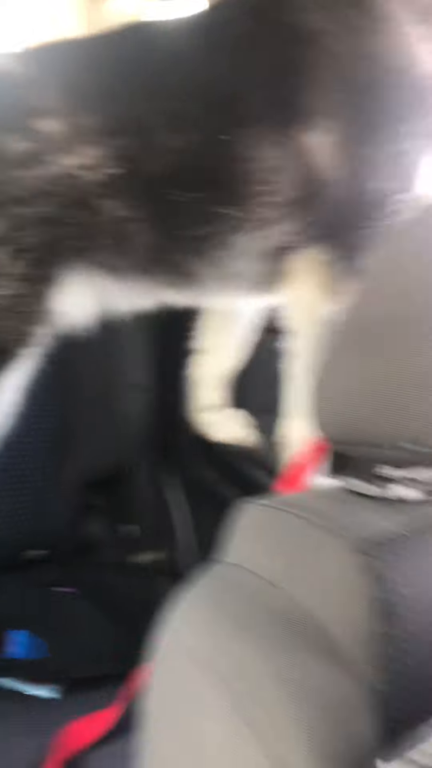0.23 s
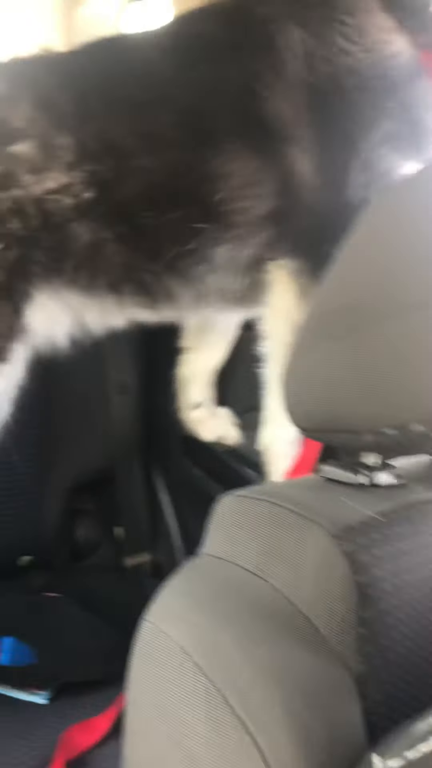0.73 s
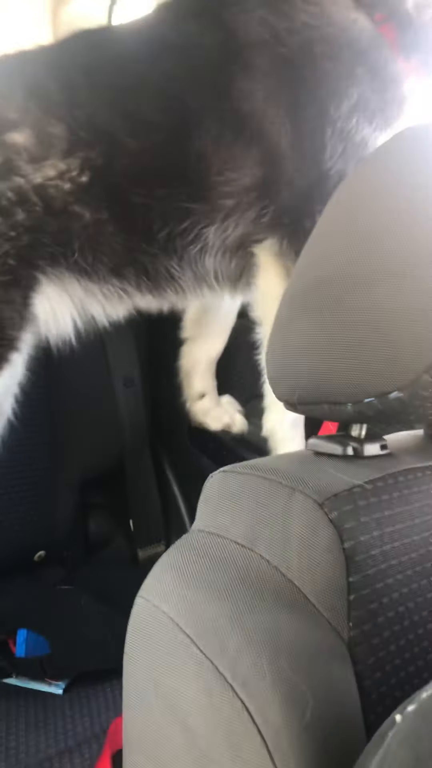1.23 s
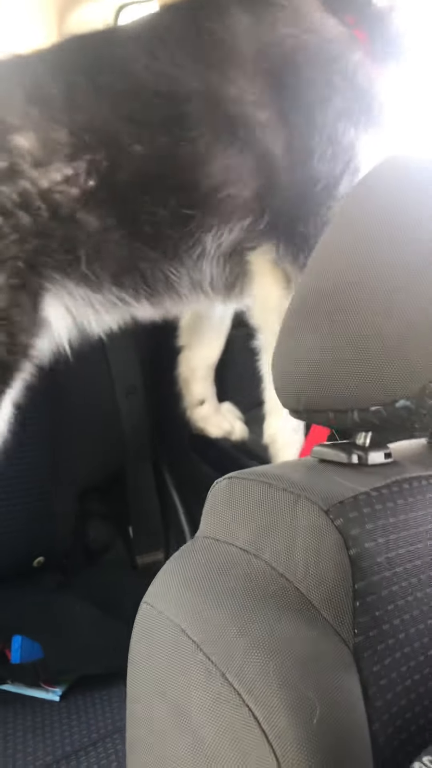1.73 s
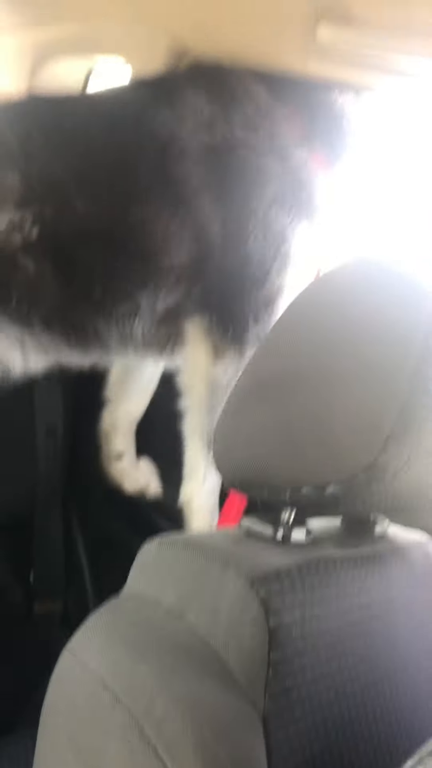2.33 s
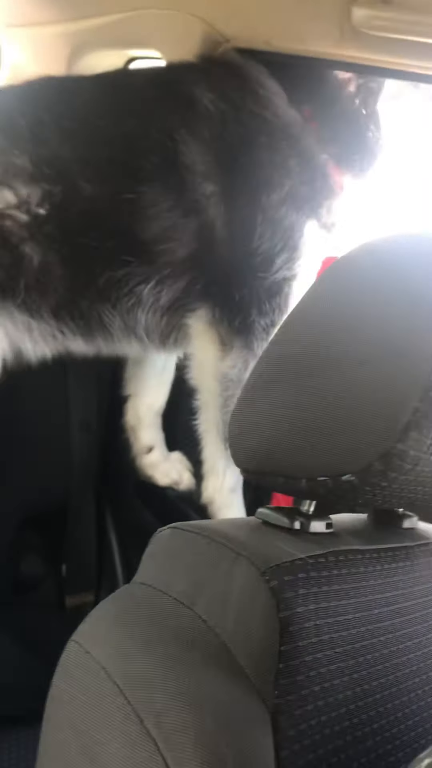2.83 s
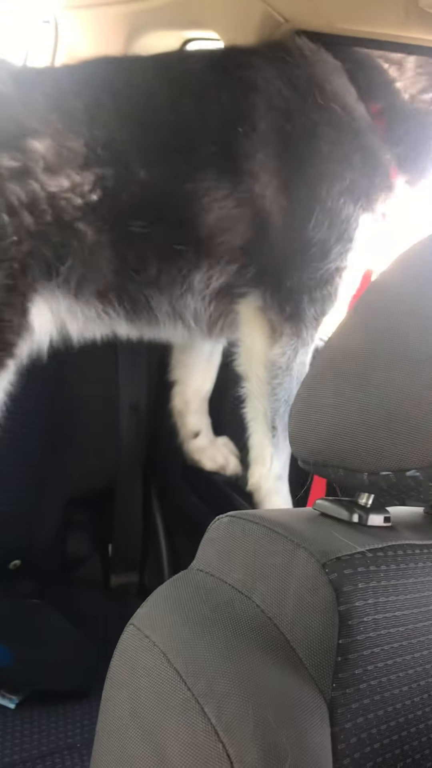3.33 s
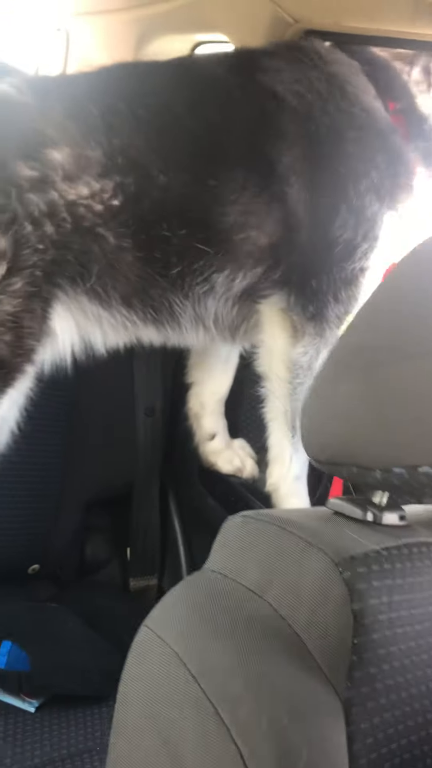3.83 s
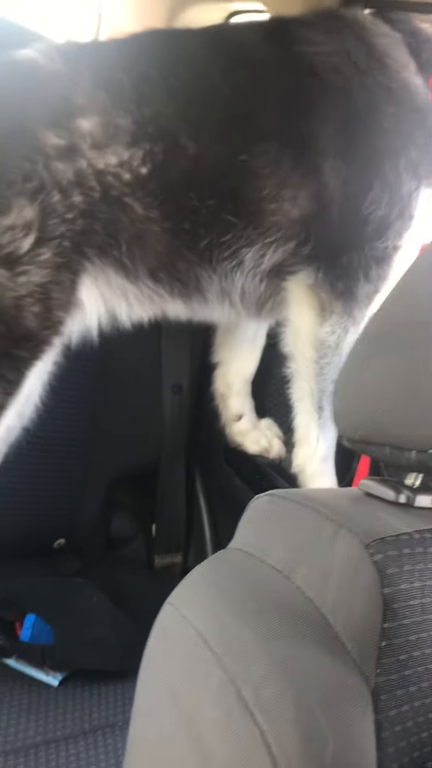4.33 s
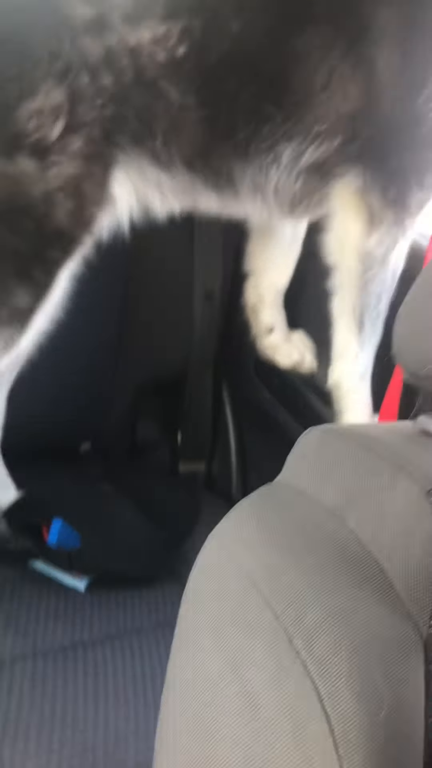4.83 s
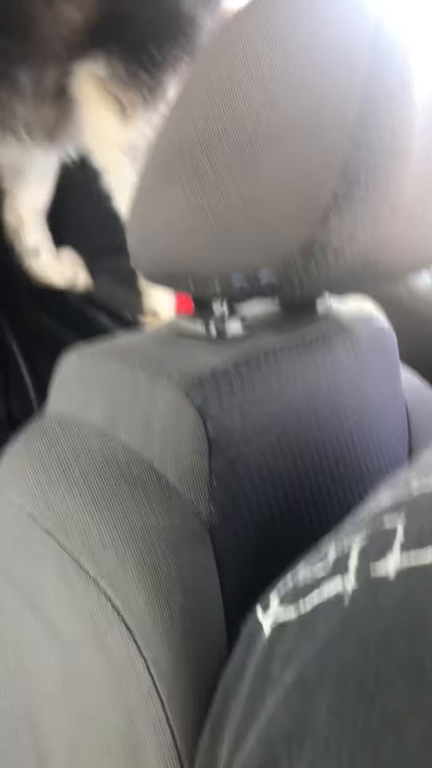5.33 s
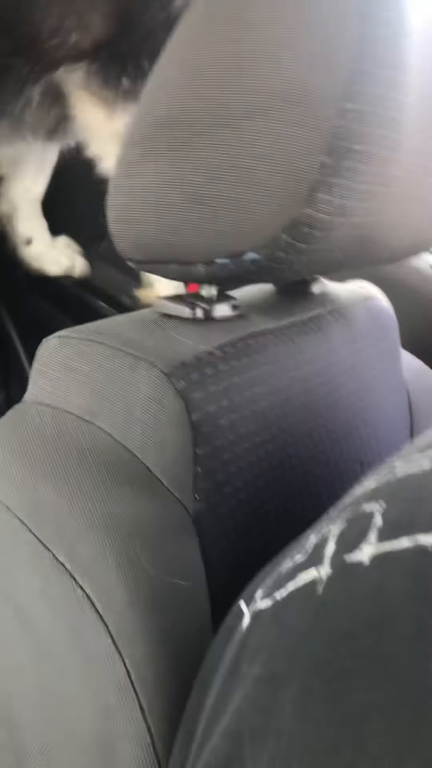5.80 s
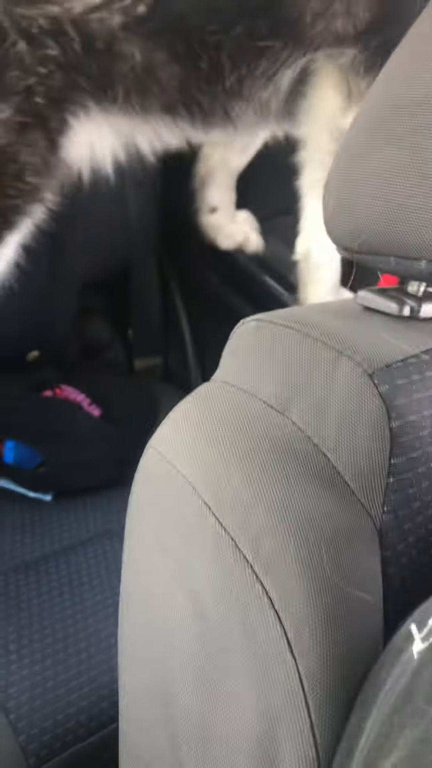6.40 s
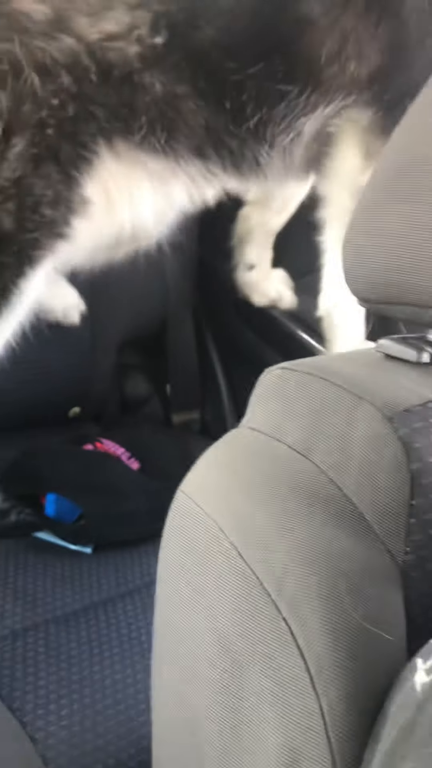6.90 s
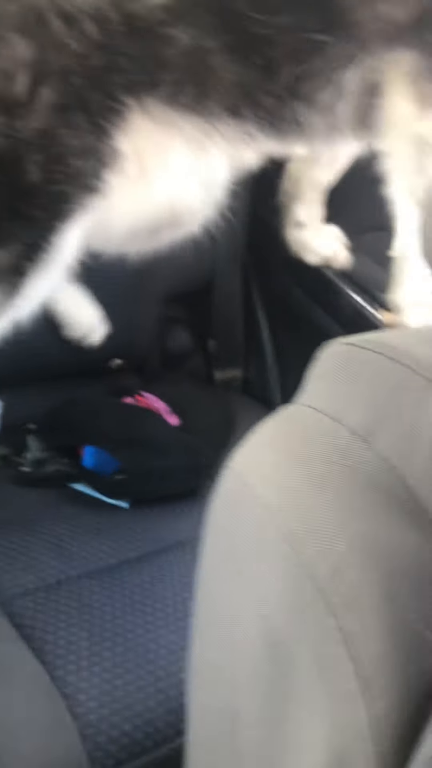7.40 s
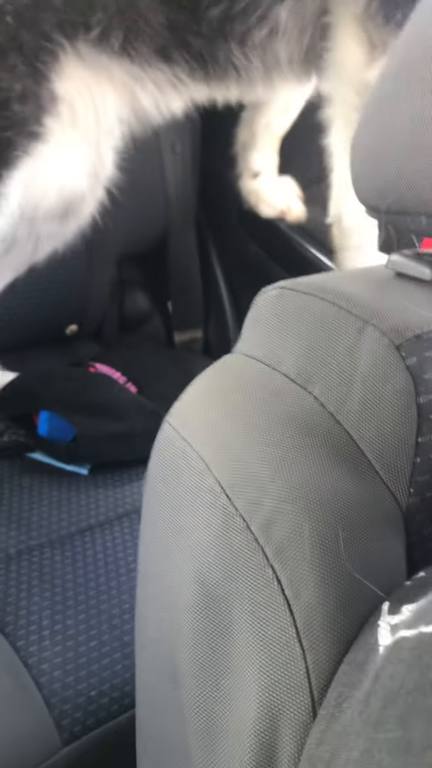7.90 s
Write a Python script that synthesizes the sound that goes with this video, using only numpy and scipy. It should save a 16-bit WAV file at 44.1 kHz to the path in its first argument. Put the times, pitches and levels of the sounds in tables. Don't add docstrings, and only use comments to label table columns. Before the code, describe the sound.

Inside a small car, a close microphone picks up deep, uneven engine and road rumble with faint claw ticks and soft fur rubbing. A dull paw thud lands around two seconds. The car eases to a quieter idle, then pulls away with the engine note climbing as buckles crack sharply and a strap scrapes plastic. Fabric slides and scattered clicks follow, dry and close.

```python
import sys
import numpy as np
from scipy import signal
from scipy.fft import rfft, irfft, next_fast_len
from scipy.io import wavfile
from scipy.ndimage import uniform_filter1d, map_coordinates

SR = 44100
rng = np.random.default_rng(int(sys.argv[2]) if len(sys.argv) > 2 else 0)


def volts_from_db(level):
    exponent = np.asarray(level, float) / 20
    return 10 ** exponent


def transcribe(signal):
    frames = np.atleast_2d(signal).T
    limited = np.clip(frames, -1, 1)
    pcm = np.round(limited * 32767).astype(np.int16)
    wavfile.write(sys.argv[1], SR, pcm)


N = 359415

# [t/s, firing rate f/Hz, level/dB]
ENGINE = [(0, 37.8, -38), (3, 36, -29.5), (4, 36.02, -35), (5.1, 33.68, -27.5), (5.4, 35.75, -29.5),
          (5.6, 39.87, -23), (5.8, 46.64, -25.5), (6, 50.8, -18), (6.15, 55.43, -19), (6.3, 55.85, -20.5),
          (6.5, 56.58, -18.5), (6.7, 59.75, -19), (6.9, 63.9, -22), (7.1, 67.4, -23), (7.5, 70.8, -26.5),
          (7.7, 72.15, -23), (7.9, 72.7, -21.5), (8.15, 75.3, -22)]
# [multiple of the firing rate, level/dB]
ORDERS = [(3.5, -20), (1.5, -24), (2, -7), (2.5, -24), (3, -14.5), (4, -20), (4.5, -23), (5, -27)]
# [f/Hz, width/Hz, level/dB]
AIR_MODES = [(108, 14, 2.5), (168, 14, 6), (220, 14, 3), (265, 34, 5.5), (335, 40, 5.5)]

# [t/s, level/dB]
TYRE_ROAR = [(0, -45), (.4, -43), (1, -46), (2.1, -45.5), (2.6, -49.5), (3.1, -50.5), (3.85, -54.5),
             (4.35, -55), (4.7, -57), (5.2, -56), (5.6, -54), (6.3, -56), (7.5, -51), (8.15, -53.5)]
# [t/s, level/dB, length/s, f/Hz]
JOLTS = [(0.052, -18.5, 0.061, 41.8), (0.393, -22.5, 0.67, 41.61), (.75, -29, 0.19, 43.1),
         (1.31, -20, 0.17, 40.9), (1.63, -23.5, 0.24, 41), (1.768, -32, 0.2, 35.8),
         (1.955, -17, 0.11, 47.73), (2.154, -21, 0.4, 52.5), (2.446, -18.5, 0.22, 53.4),
         (2.726, -24.5, 0.42, 50.4), (3.004, -29, 1, 37.13), (3.386, -23, 0.32, 52.5)]
# [t/s, level/dB, length/s]
HEAVES = [
    (.6, -21.5, 0.36),
    (1.27, -19, 0.44),
    (2.15, -26, .4),
    (2.72, -19, 0.2),
    (3.0, -30, 0.41),
    (4.47, -37, 0.21),
    (5.47, -26, 0.72),
    (6.13, -21.5, 0.79),
    (6.85, -19, 0.92),
    (7.4, -25, 0.88),
]
# [t/s, level/dB, length/s]
COARSE_PATCHES = [
    (.12, -25.5, 0.07),
    (.33, -28, 0.16),
    (1.1, -27.5, 0.31),
    (1.5, -20.5, 0.38),
    (2.1, -26, 0.66),
    (2.5, -22.5, 0.64),
    (2.95, -31, 0.11),
    (4.04, -24.5, 0.071),
    (5.67, -26.5, 0.097),
    (7.4, -25.5, 1.033),
]
# [t/s, level/dB, length/s]
ROAD_JOINTS = [
    (0, -24, 0.026),
    (.29, -25.5, 0.068),
    (1.05, -30, 0.15),
    (1.25, -28.5, 0.26),
    (1.8, -34.5, .25),
    (2.07, -29, 0.13),
    (3.0, -37, 0.19),
    (3.45, -34.5, 0.61),
    (3.8, -33, 0.12),
    (5.15, -33, 0.087),
]
# [f/Hz, level per Hz/dB]
BOOM_TONE = [(11, -28), (18, -6), (43, -3), (90, -6), (120, -37.5), (200, -120)]
DRONE_TONE = [(38, 1), (65, -1), (76, -1.5), (108, 2), (160, -17), (210, -22.5), (350, -120)]
BODY_TONE = [(76, -15.5), (130, 0), (157, -1.5), (193, -1.5), (258, -9), (365, -16), (398, -18.5),
             (450, -30), (520, -26.5), (680, -53), (1140, -120)]
TYRE_TONE = [(250, -11), (420, -2.5), (453, 0), (507, -2.5), (573, -4.5), (740, -4.5), (1060, -8.5),
             (1380, -8.5), (1600, -13), (1990, -18.5), (4000, -38), (5200, -71), (8800, -120)]

# [t/s, level/dB, length/s]
RUBS = [(0, -65, .05), (.42, -62.5, 0.52), (.68, -60, 0.17), (1.03, -62.5, 0.37), (1.37, -60.5, 0.52),
        (1.62, -61.5, 0.39), (2.17, -62.5, 0.2), (2.46, -64, 0.67), (3.02, -64.5, 0.26),
        (3.61, -65.5, 0.09), (4.2, -68, .15), (4.4, -76, 0.17), (4.85, -64.5, 0.22), (5, -60.5, 0.2),
        (5.17, -65, 0.099), (5.4, -58.5, 0.18), (5.68, -62, 0.65), (5.89, -51.5, 0.067), (6.1, -65.5, 0.19),
        (6.3, -63.5, .15), (6.5, -64, 0.13), (6.68, -63, .06), (6.77, -59.5, 0.22), (6.855, -52, 0.072),
        (6.97, -65, 0.13), (7.02, -61, 0.064), (7.1, -63, 0.11), (7.22, -56.5, 0.3), (7.4, -60, 0.15),
        (7.61, -60, 0.091), (7.71, -57.5, 0.29), (8, -64, 0.96)]
# [f/Hz, level per Hz/dB]
CLOTH_TONE = [(1500, -11), (2500, -2.5), (4200, -3.5), (5200, -5), (7000, -8.5), (9300, -9), (10500, -10),
              (12000, -11), (14500, -15), (15900, -14)]
# [t/s, level/dB, length/s]
SLIDES = [
    (6.545, -54.5, 0.1),
    (6.92, -54, .16),
    (7.06, -56, .06),
    (7.33, -57.5, .2),
    (7.44, -61, 0.099),
    (7.475, -44.5, 0.083),
    (7.515, -46.5, 0.094),
]
# [f/Hz, width/Hz, level/dB]
WEAVE = [(2900, 620, 1.5), (4300, 600, 3.5), (6200, 1500, 0.5), (8900, 1100, -3), (12300, 3300, -3.5),
         (15000, 2500, -10.5)]

# [t/s, peak level/dB, panel knock/dB, bright edge/dB]
BUCKLES = [(1.6175, -30, -14, -9.5), (5.243, -44, -1, -3), (5.3153, -27.5, -18, -34.5),
           (5.4097, -40, -7, -25), (5.4621, -13, -20, -6.5), (5.5752, -21, -29, -40),
           (5.5914, -24.5, -18, -27), (5.6148, -23.5, -21, -7.5), (5.668, -35.5, -25, -20),
           (5.7295, -23.5, -6, -3.5), (5.6965, -42, -10, -10), (5.606, -33, -18, -20),
           (5.716, -51, -17, -15), (5.9384, -33.5, -21, -32), (5.9622, -33, -9, -17),
           (5.9704, -33, -12, -15.5), (6.003, -40.5, -15, -1), (6.297, -35.5, -14, -27.5),
           (6.551, -30, -14, -12), (6.5834, -28, -15, -4.5), (6.765, -43.5, -10, 2.5), (6.777, -44, 4.5, 5),
           (7.162, -31, -19, -3), (7.2546, -33.5, -19, -25), (7.5289, -30, -25, -31),
           (7.6826, -40, -14, -18), (7.6954, -34, -26, -25), (7.7034, -32, -19, -26),
           (7.7145, -32, -25, -22)]
# [t/s, peak level/dB, bright edge/dB]
CLAWS = [(.0792, -42.5, -23), (0.1096, -41, -27), (.1595, -53, -25), (.2468, -39, -20), (.2826, -43, -25),
         (.3132, -34.5, -20), (.4309, -48, -25), (.4574, -43, -22), (0.5264, -34, -23), (0.566, -42, -25),
         (.595, -47, -20), (.6789, -43, -20), (.7267, -48, -25), (.7555, -42.5, -20), (.8884, -44, -23),
         (0.9270, -47, -25), (1.4428, -41.5, -25), (1.654, -51, -8), (2.6204, -50, -26), (2.887, -58, -2),
         (2.9632, -43.5, -19), (5.518, -48, -3), (5.641, -50, 0), (6.0347, -44.5, -25), (6.3884, -44, -25),
         (6.632, -45, -12), (6.683, -46, -4), (6.9626, -45, -20), (7.0203, -43, -25), (7.085, -49, -20),
         (7.506, -44, -9), (7.61, -43, -14), (7.7625, -49, 0), (7.789, -44, -28), (8.0346, -54, -18)]
# [t/s, peak level/dB, ring f/Hz, panel knock/dB]
TRIM_TAPS = [(4.362, -51, 1980, 8), (4.523, -47, 1650, -4), (5.1545, -45, 2300, -14),
             (5.26, -41, 1985, -19), (5.348, -42, 2360, -22), (5.364, -37, 2400, -12),
             (5.391, -42, 1900, 1), (5.512, -32, 1670, -19), (5.525, -48, 1900, 6), (5.543, -35, 1650, 7),
             (5.549, -43, 1850, 5), (5.5538, -26.5, 1910, -21), (5.562, -26, 1879, -5),
             (5.567, -35, 1800, 3), (5.576, -15, 2560, -18), (5.579, -17.5, 1780, -22),
             (5.606, -42, 1900, 8), (5.621, -40.5, 2760, 0), (5.669, -40, 1960, -16),
             (5.715, -48, 2006, -14), (7.162, -32.5, 1940, -14), (7.255, -35, 1967, 2.5),
             (7.311, -45.5, 1929, 0), (7.506, -30.5, 1630, -4), (7.683, -40, 1890, -27),
             (7.694, -36.5, 2601, -22), (7.699, -36, 1920, -23), (7.702, -44, 2656, -22),
             (7.7628, -39.5, 2300, -17)]
# [t/s, peak level/dB, f/Hz, t60/s]
PAWS = [(1.418, -33, 750, 0.04), (2.05, -27, 260, 0.058), (2.066, -26, 380, 0.07),
        (2.075, -27.5, 448, 0.05), (2.078, -39, 800, .04), (2.093, -28, 433, 0.035),
        (2.095, -28, 228, 0.044), (2.117, -45, 680, 0.043), (2.966, -41.5, 850, .035),
        (4.801, -40, 670, 0.072), (4.813, -43.5, 848, 0.064), (5.247, -42, 835, 0.046),
        (5.262, -46.5, 900, 0.036), (5.41, -42, 900, .04), (5.47, -38, 870, 0.06), (5.528, -40, 900, .07),
        (5.62, -40, 880, .05)]
# [t/s, level/dB, length/s]
DRAGS = [(5.265, -65, .05), (5.35, -48, 0.044), (5.385, -47, 0.08), (5.49, -47, 0.07), (5.55, -47, 0.058),
         (5.6, -45, 0.065), (5.7, -58, 0.15), (5.95, -63, .7), (6.56, -61, 0.5), (6.9, -63, .4),
         (7.25, -59, 0.4), (7.48, -41.5, 0.058), (7.7, -53, 0.036)]
# [f/Hz, width/Hz, level/dB]
TRIM_MODES = [(880, 110, -6), (1240, 420, -21), (1800, 900, -5), (2590, 180, 4), (3550, 1100, -1.5)]
# [f/Hz, level per Hz/dB]
STRAP_TONE = [(450, -47), (700, 1), (1000, 3.5), (3000, -10.5), (5000, -13), (8000, -17.5)]
# [t/s, level/dB]
JINGLES = [
    (5.518, -59),
    (5.614, -45.5),
]
# [f/Hz, level/dB, t60/s]
TAG_MODES = [(4500, -6, .09), (5464, -3, .06), (6223, -10, .07), (8820, -0.5, .11), (10130, -9, .06),
             (10900, -9, .055), (11870, -11, .08), (13650, -14, .046)]

# [f/Hz, level per Hz/dB]
HISS_TONE = [(1470, -15.5), (2500, 0.5), (2600, -5.5), (3600, -7), (4500, -7), (4790, -12), (6140, -8.5),
             (9610, -15), (10500, -13.5), (11800, -13.5), (15900, -21)]

CRUISE_DB = -50
BOOM_DB, DRONE_DB, BODY_DB = -34.5, -30.5, -35.5
BOOM_GROWS, DRONE_GROWS, BODY_GROWS = 0.18, 0.19, 0.62
EDGE_DB, RISE_SHARE = 9.5, 0.48
SLIDE_SHARE = 0.88
CRACK_HZ, BRIGHTER = 2410, 0.12
CRACK_T60, LONGER = 0.047, 0.35
CLAW_KNOCK_DB = -8.5
HISS_DB = -69
PORT_HZ, PORT_WIDTH_HZ, PORT_DIP = 10440, 790, 0.45
TOP_HZ, SKIRT_HZ = 15880, 130


def engine():
    hz, db = curves(ENGINE)
    turn = 2 * np.pi * np.cumsum(hz * (1 + 0.0029 * wobble(11.0))) / SR
    note = volts_from_db(db + 0.89 * wobble(4.5)) * np.sqrt(2) * np.sin(turn)
    octaves = np.log2(hz / 68)
    revs_db = -23.5 + np.minimum(12 * octaves, -20 * octaves)
    upper = np.zeros(N)
    for k, order_db in ORDERS:
        air_db = -3.5
        for mode_hz, width, mode_db in AIR_MODES:
            air_db = air_db + mode_db * np.abs(resonance(k * hz, mode_hz, width)) ** 2
        level = volts_from_db(order_db + air_db + 2.0 * wobble(3.2))
        upper += level * np.sin(k * turn + rng.uniform(0, 2 * np.pi))
    return note + volts_from_db(revs_db) * upper


def road():
    tyre_db, = curves(TYRE_ROAR)
    fast_db = tyre_db - CRUISE_DB
    bumps = wobble(11)
    pulling = np.clip((curves(ENGINE)[0] - 38) / 14, 0, 1)

    boom = swells(HEAVES, BOOM_DB + BOOM_GROWS * fast_db) * rush(BOOM_TONE, patchy_db=-0.8)
    boom *= volts_from_db(-3.5 - 2.7 * pulling + 1.5 * bumps)
    drone = swells(COARSE_PATCHES, DRONE_DB + DRONE_GROWS * fast_db) * rush(DRONE_TONE, patchy_db=-1.06)
    drone *= volts_from_db(-2.5 * pulling + 0.45 * bumps)
    body = swells(ROAD_JOINTS, BODY_DB + BODY_GROWS * fast_db + 0.25 * pulling)
    body *= volts_from_db(1.04 * bumps + 0.49 * wobble(25)) * rush(BODY_TONE, patchy_db=0.3)
    tyres = volts_from_db(tyre_db + 0.5 * bumps + 0.2 * wobble(30)) * rush(TYRE_TONE, patchy_db=0.92)
    return shudder() + boom + drone + body + tyres


def shudder():
    t = np.arange(N) / SR
    uneven_t = np.cumsum(1 + 0.0417 * wobble(14)) / SR
    rings = np.zeros(N)
    for s, db, length, hz in JOLTS:
        rings += volts_from_db(db) * swell(s, length, t) * np.sin(2 * np.pi * hz * uneven_t)
    return volts_from_db(-1.6 + 1.65 * wobble(11)) * np.sqrt(2) * rings


def cloth():
    slips = volts_from_db(0.4 * wobble(30) + 1.1 * wobble(160)) * rush(CLOTH_TONE, patchy_db=1.0)
    return swells(RUBS, base_db=-84) * unit(slips)


def slides():
    def weave(f):
        return np.sqrt(sum(np.abs(volts_from_db(db) * resonance(f, hz, width)) ** 2 for hz, width, db in WEAVE))

    slips = volts_from_db(0.8 * wobble(120)) * rush([(1500, -20.5), (2500, 2), (16000, -3.5)], patchy_db=2.0)
    return swells(SLIDES, base_db=-100, share=SLIDE_SHARE) * unit(filtered(slips, weave))


def clicks():
    out = np.zeros(N + SR)
    claws = [(s, db, CLAW_KNOCK_DB, edge_db) for s, db, edge_db in CLAWS]
    for s, db, low_db, edge_db in [*BUCKLES, *claws]:
        hz = CRACK_HZ * volts_from_db(BRIGHTER * (db + 42))
        t60 = CRACK_T60 * volts_from_db(LONGER * (low_db + 19.0))
        reach = 9000 * volts_from_db(0.28 * (db + 36.0))
        body = burst(t60 * 0.95, 0.00023, lambda f: resonance(f, hz, 2700) * resonance(f, 0.82 * hz, 2500))
        edge = burst(t60 * 0.76, 0.00026, lambda f: resonance(f, 5600, 5800) * resonance(f, 6000, reach))
        air = burst(t60 * 0.35, 0.0002, lambda f: resonance(f, 13000, 6000) ** 2)
        knock = volts_from_db(low_db + 3.5) * hollow(t60 * 1.5)
        bright = volts_from_db(edge_db + 2.5) * (edge + volts_from_db(-12.5) * air)
        add_at(out, s, volts_from_db(db - 1.0) * (body + knock + bright))
    return out[:N]


def knocks():
    out = np.zeros(N + SR)
    for s, db, hz, low_db in TRIM_TAPS:
        def trim(f):
            narrow = resonance(f, hz, 340) * resonance(f, hz, 900)
            return narrow + 0.043 * resonance(f, 2930, 1800) ** 2

        ring = burst(0.024, 0.00025, trim)
        add_at(out, s, volts_from_db(db) * (ring + volts_from_db(low_db) * hollow(0.081)))
    return out[:N]


def hollow(t60):
    return burst(t60, 0.00088, lambda f: resonance(f, 817, 350) * resonance(f, 1100, 1100))


def thuds():
    out = np.zeros(N + SR)
    for s, db, hz, t60 in PAWS:
        puff = burst(t60, 0.0034, lambda f: resonance(f, hz, 0.76 * hz) ** 3)
        add_at(out, s, volts_from_db(db) * puff)
    return out[:N]


def scrape():
    def trim(f):
        modes = enumerate(TRIM_MODES)
        return sum((-1) ** k * volts_from_db(db) * resonance(f, hz, width) for k, (hz, width, db) in modes)

    grains = volts_from_db(4.6 * wobble(280)) * rush(STRAP_TONE, patchy_db=1.5)
    return swells(DRAGS, base_db=-95) * unit(filtered(grains, trim))


def tag():
    out = np.zeros(N + SR)
    t = np.arange(SR // 4) / SR
    for s, db in JINGLES:
        for hz, mode_db, t60 in TAG_MODES:
            add_at(out, s, volts_from_db(db + mode_db - 60 * t / t60) * np.sin(2 * np.pi * hz * t))
    return out[:N]


def cabin(x):
    t = np.arange(SR // 4) / SR
    turns = np.arange(5)[:, None]
    tails = rng.standard_normal((len(turns), len(t))) * volts_from_db(-60 * t / 0.076)
    tails /= np.linalg.norm(tails[0])
    parts = x * (np.arange(N) // 700 % len(turns) == turns)
    return x + volts_from_db(-8.5) * signal.fftconvolve(parts, tails, axes=1)[:, :N].sum(axis=0)


def hiss():
    return volts_from_db(HISS_DB) * rush(HISS_TONE, patchy_db=0.9)


def unit(x):
    return x / np.sqrt(np.mean(x ** 2) + 1e-20)


def curves(rows):
    s, *cols = np.transpose(rows)
    return [np.interp(np.arange(N) / SR, s, c) for c in cols]


def wobble(rate):
    knots = rng.standard_normal(int(N * rate / SR) + 4)
    return map_coordinates(knots, [np.arange(N) * rate / SR])


def rush(spectrum, patchy_db):
    z = signal.stft(rng.standard_normal(N + 8192), nperseg=512)[2]
    field = uniform_filter1d(rng.standard_normal(z.shape), size=5, axis=0)
    field = uniform_filter1d(field, size=10, axis=1)
    x = signal.istft(z * volts_from_db(patchy_db * unit(field)), nperseg=512)[1]
    m = next_fast_len(len(x))
    f, db = np.transpose(spectrum)
    log_f = np.log(np.fft.rfftfreq(m, 1 / SR) + 1)
    gain = volts_from_db(np.interp(log_f, np.log(f + 1), db, -120, -120))
    return unit(irfft(rfft(x, m) * gain, m)[:N])


def resonance(f, hz, width):
    return 1j * f * width / (hz * hz - f * f + 1j * f * width)


def filtered(x, response):
    m = next_fast_len(N + 8192)
    return irfft(rfft(x, m) * response(np.fft.rfftfreq(m, 1 / SR)), m)[..., :N]


def burst(t60, rise, response):
    t = np.arange(8192) / SR
    x = rng.standard_normal(len(t)) * volts_from_db(-60 * t / max(t60, 0.01)) * (1 - np.exp(-t / rise))
    x[round(rise * SR)] += 11 * np.exp(-rise / 0.00045)
    x = irfft(rfft(x) * response(np.fft.rfftfreq(len(t), 1 / SR)))
    return x / np.abs(x).max()


def add_at(out, s, sound):
    out[round(s * SR):][:len(sound)] += sound


def swell(s, length, t, share=RISE_SHARE):
    share = np.clip(share, 0.05, 0.95)
    away = np.maximum((s - t) / share, (t - s) / (1 - share))
    return volts_from_db(-EDGE_DB * away / max(length, 0.02))


def swells(rows, base_db, share=RISE_SHARE):
    t = np.arange(0, N + 64, 64) / SR
    power = sum((volts_from_db(db) * swell(s, length, t, share)) ** 2 for s, db, length in rows)
    return np.sqrt(volts_from_db(base_db) ** 2 + np.interp(np.arange(N) / SR, t, power))


def scene():
    contacts = clicks() + knocks() + thuds() + scrape() + tag()
    near = cloth() + slides() + cabin(contacts)
    return (engine() + road() + near + hiss())[None]


def roll_off(x):
    return signal.sosfilt(signal.butter(12, 16540, fs=SR, output="sos"), x)


def record(dry):
    def port(f):
        notch = 1 - PORT_DIP * resonance(f, PORT_HZ, PORT_WIDTH_HZ)
        return notch * np.clip((TOP_HZ - f) / SKIRT_HZ, 0, 1) ** 2

    return roll_off(filtered(dry, port))


dry = scene()
out = record(dry)
transcribe(out)
```